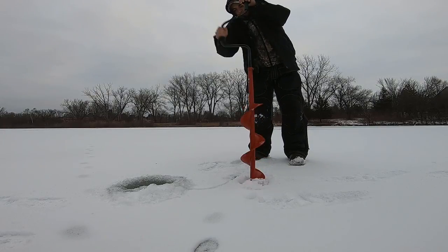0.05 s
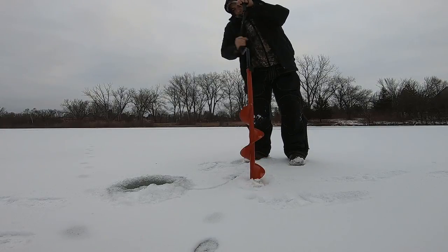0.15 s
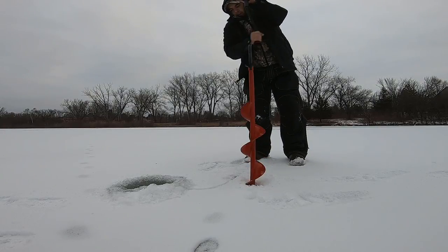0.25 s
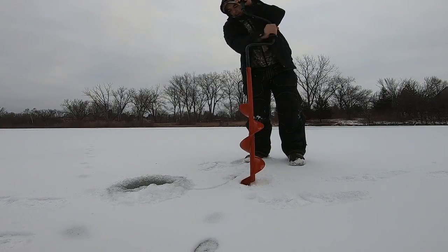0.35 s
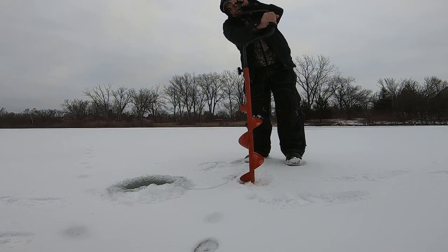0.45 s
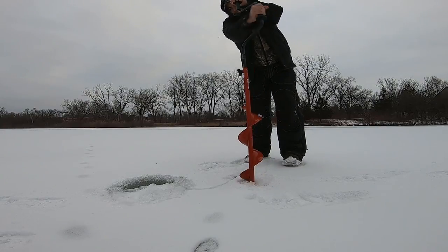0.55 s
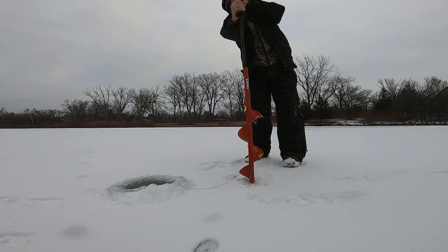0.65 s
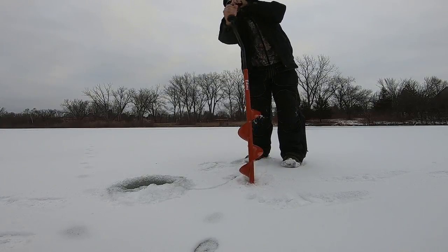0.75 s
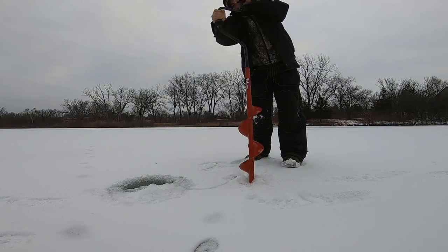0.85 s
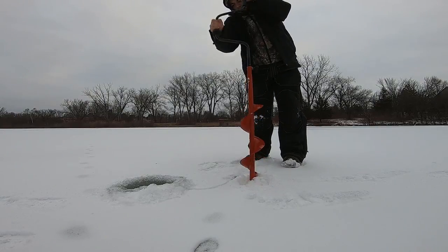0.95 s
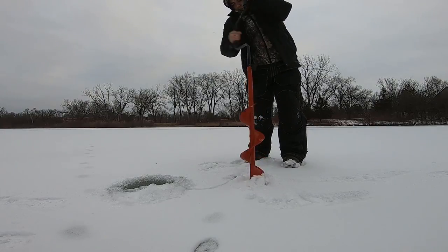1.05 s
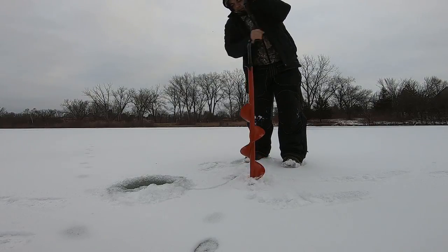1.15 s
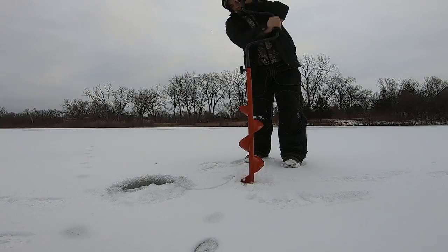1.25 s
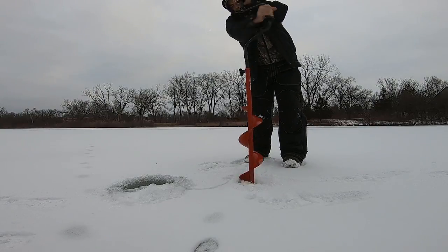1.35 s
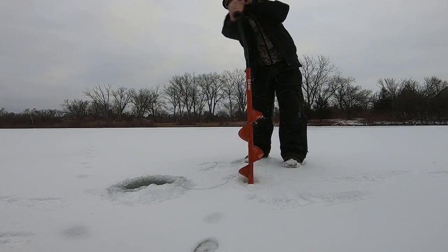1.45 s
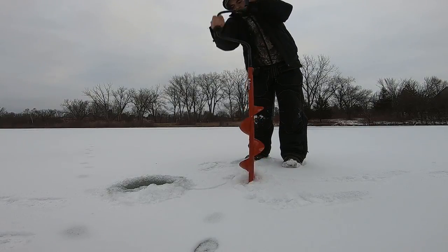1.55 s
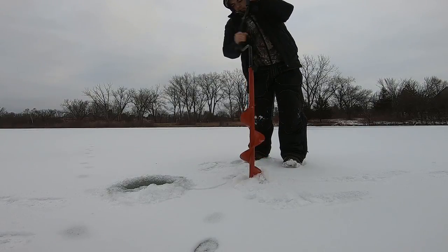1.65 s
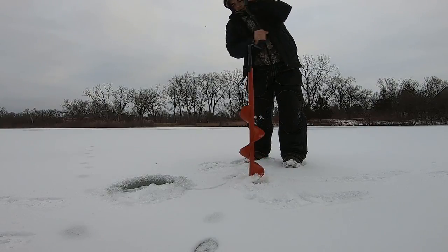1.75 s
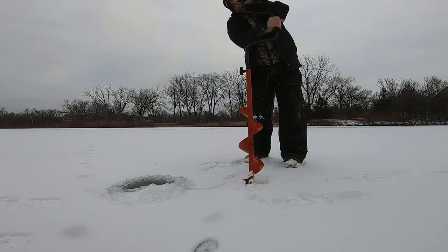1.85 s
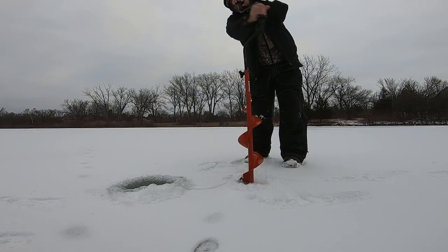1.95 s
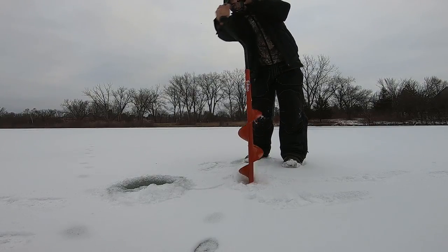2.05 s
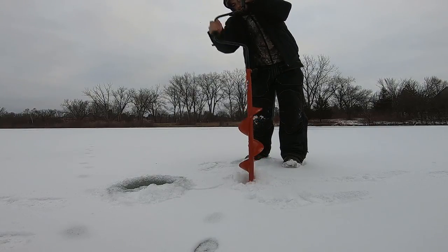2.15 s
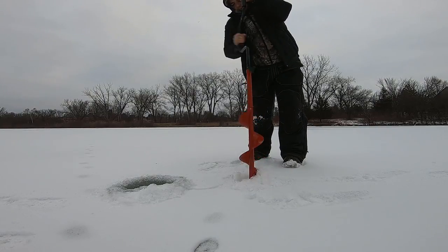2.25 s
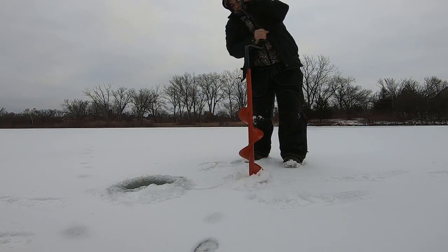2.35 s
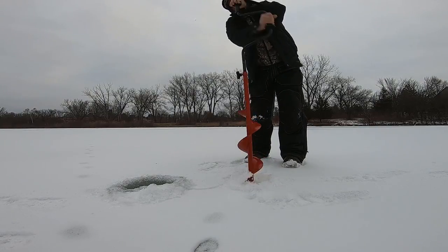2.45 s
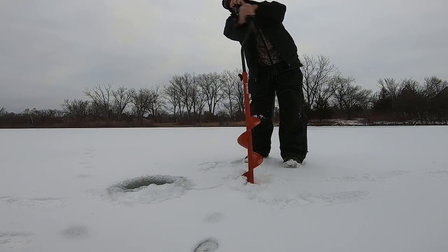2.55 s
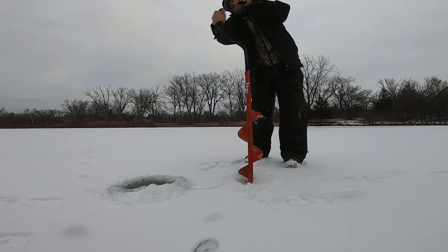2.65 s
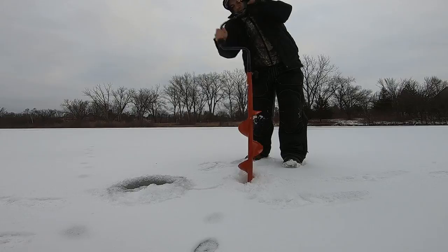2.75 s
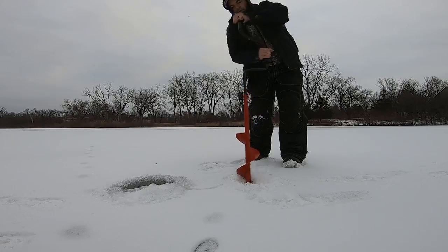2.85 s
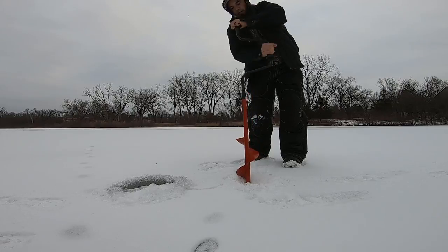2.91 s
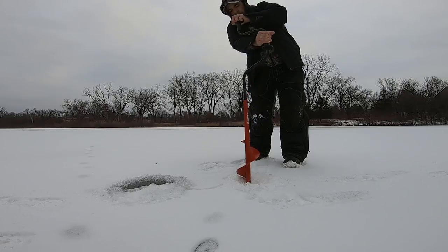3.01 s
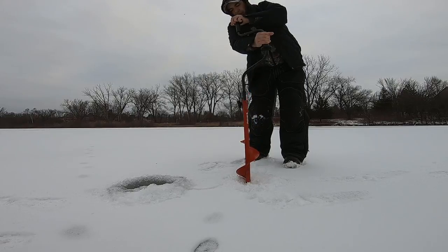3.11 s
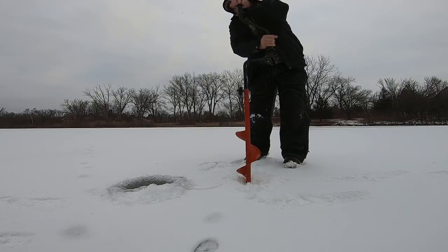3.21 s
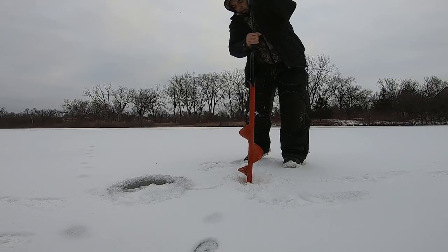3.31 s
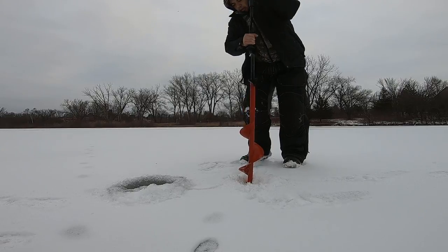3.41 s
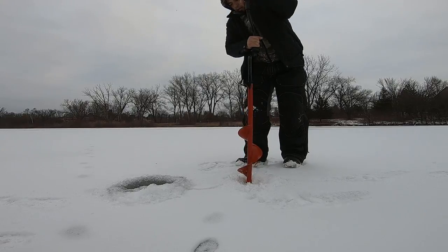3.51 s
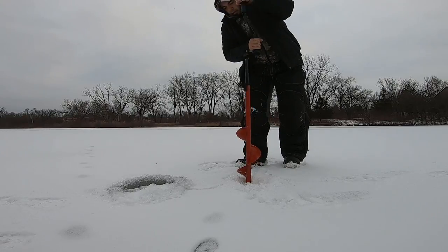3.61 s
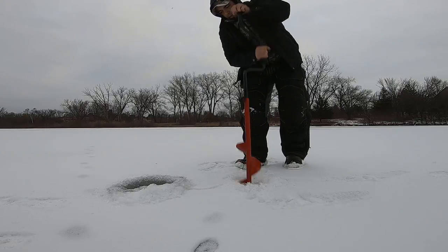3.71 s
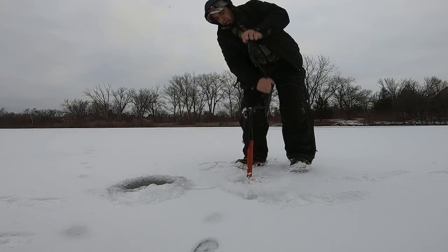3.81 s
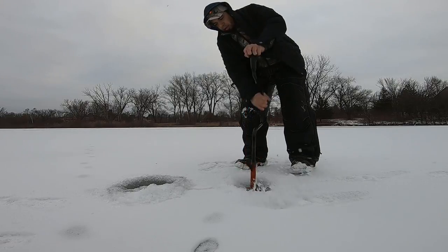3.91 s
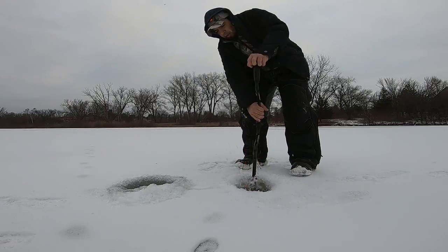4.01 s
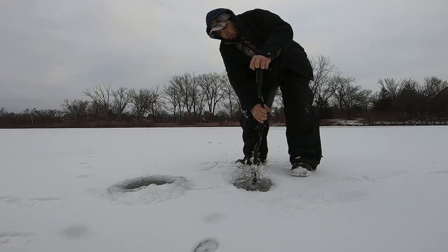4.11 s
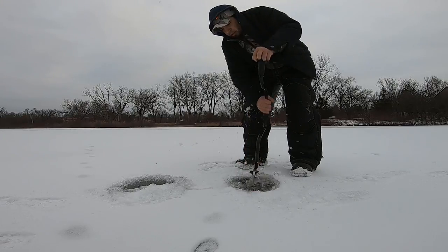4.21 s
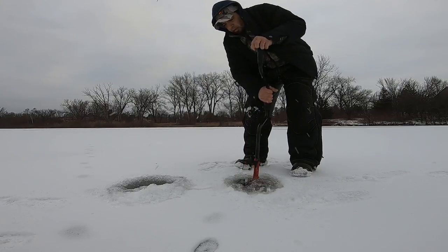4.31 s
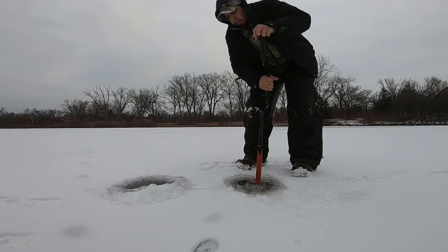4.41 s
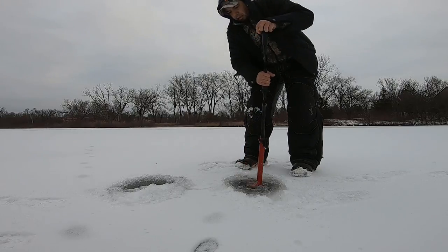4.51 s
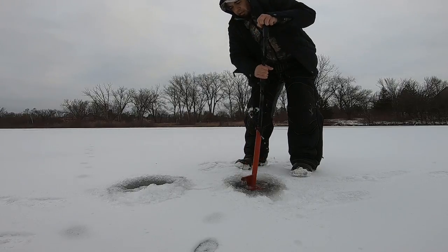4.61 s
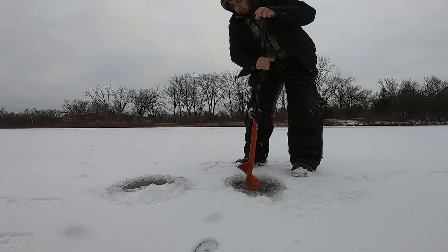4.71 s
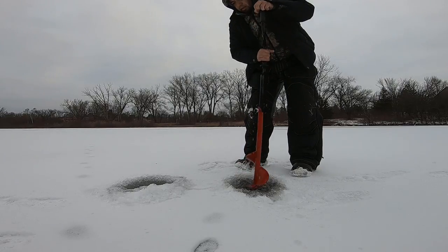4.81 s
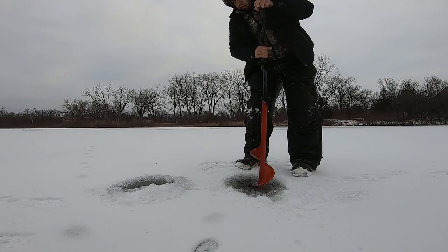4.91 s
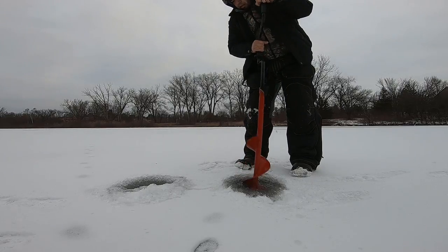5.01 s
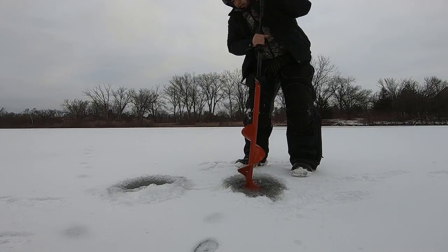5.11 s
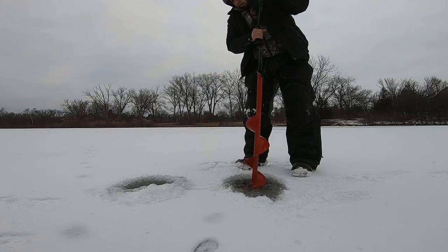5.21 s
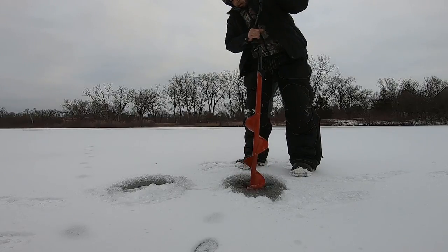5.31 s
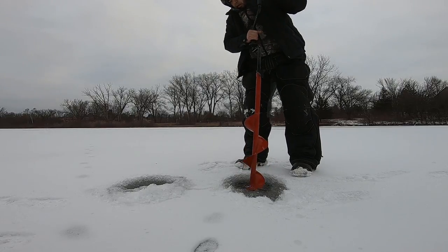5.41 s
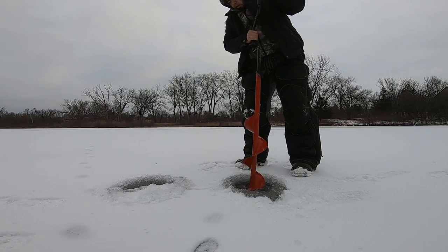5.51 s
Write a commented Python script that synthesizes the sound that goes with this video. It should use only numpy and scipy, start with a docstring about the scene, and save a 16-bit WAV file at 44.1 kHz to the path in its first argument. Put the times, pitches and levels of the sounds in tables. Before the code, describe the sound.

Steel blades chatter and scrape in ice for three seconds, followed by a brief lull, a bubbling surge of water and slapping slush.

```python
"""A hand auger is cranked through lake ice, a few steps away: fractures ring its flights for three seconds.
The blades chatter and chirp as noise rings gliding resonances, then they break through with a knock.
Water gushes up the hole, then lumps of slush slap back: bursts of coloured grains, with ringing bubbles.
Short filtered noise bursts tick, crack and plop. Coloured noise makes a light, rumbling wind and a faint hiss."""
import sys
import numpy as np
from scipy import signal
from scipy.fft import rfft, irfft
from scipy.io import wavfile

SR = 44100
rng = np.random.default_rng(int(sys.argv[2]) if len(sys.argv) > 2 else 0)


def materialize(psi):
    """Save the field psi as 16-bit PCM at rate SR to the path in sys.argv[1].

    A 1-D psi becomes a single channel; in a 2-D psi each row is a channel.
    """
    bounded = np.clip(np.atleast_2d(psi).T, -1, 1)
    quanta = np.round(bounded * 32767).astype(np.int16)
    wavfile.write(sys.argv[1], SR, quanta)


N = 245195

# A knock as the ice breaks, then surges of water and falling slush. Each row: start in seconds,
# length in seconds, spray level in dB, splash level in dB, crunch pitch in Hz.
SPLATS = [(3.025, 0.0039, -37, -32.5, 1200), (3.782, 0.011, -26.5, -41, 2320),
          (3.797, 0.018, -25.5, -29.5, 1950), (3.816, 0.013, -24.5, -40, 1870),
          (3.825, 0.021, -25.5, -31.5, 2790), (3.854, 0.014, -30, -39, 1470),
          (3.861, 0.013, -23.5, -29.5, 2400), (3.875, 0.012, -25.5, -30, 1500),
          (3.896, 0.025, -26, -23.5, 1300), (3.911, 0.013, -22.5, -25, 2470),
          (3.934, 0.0078, -25.5, -31, 4340), (3.944, 0.023, -28.5, -51, 1500),
          (3.969, 0.015, -26.5, -22, 1430), (3.983, 0.02, -25.5, -36, 1580),
          (4.037, 0.029, -36, -29.5, 1560), (4.534, 0.012, -34.5, -37, 1780), (4.561, 0.02, -39, -43, 1590),
          (4.609, 0.024, -37, -48, 2900), (4.645, 0.015, -40, -56, 2130), (4.67, 0.013, -30, -50, 3270),
          (4.699, 0.014, -28, -29.5, 1520), (4.712, .008, -28, -34, 2310), (4.737, .003, -35.5, -37, 4400),
          (4.854, 0.0044, -25, -26.5, 2250), (4.866, 0.01, -26.5, -33.5, 3670),
          (4.901, 0.0066, -27, -52, 3400), (4.916, 0.0049, -27, -43, 3900),
          (4.942, 0.0081, -24.5, -36, 3200), (4.951, 0.016, -28.5, -33, 3800),
          (5.011, 0.0088, -25.5, -56, 2510), (5.072, .017, -25.5, -42, 2200),
          (5.102, 0.018, -26.5, -38.5, 2520), (5.14, 0.0091, -35.5, -53, 1870),
          (5.228, 0.0046, -24, -39, 3770), (5.236, 0.008, -25, -39, 7000), (5.314, 0.012, -27.5, -34, 1610),
          (5.362, 0.024, -37, -35, 3020), (5.447, 0.016, -37.5, -36.5, 1300)]
# Colour of froth. Each row: frequency in Hz, density in dB per Hz.
FROTH_COLOUR = [(250, -3.5), (480, 17), (800, 9), (1400, 6.5), (2200, -21), (5000, -64)]
# Colour of heaving water. Each row: frequency in Hz, density in dB per Hz.
SLOSH_COLOUR = [(40, -33), (110, -11), (160, -1.5), (240, -2.5), (400, -10.5), (650, -52), (2000, -27.5)]
# How hard the water in the hole is stirred. Each row: time in seconds, level in dB.
STIR = [(3.08, -41), (3.13, -51.5), (3.33, -56), (3.4, -47), (3.6, -56.5), (3.67, -53), (3.71, -56),
        (3.77, -46), (3.94, -27.5), (3.99, -25), (4.09, -36.5), (4.22, -43.5), (4.3, -44.5), (4.39, -47.5),
        (4.48, -50.5), (4.6, -37.5), (4.66, -33), (4.73, -38), (4.77, -54.5), (4.84, -42.5), (4.9, -41.5),
        (5.1, -31.5), (5.18, -43), (5.4, -44.5), (5.55, -52)]


def from_db(db):
    """Decibels to gain."""
    return 10 ** (np.asarray(db) / 20)


def rms_one(x):
    """Scale to unit power."""
    return x / np.sqrt(np.mean(x ** 2) + 1e-20)


def add(track, s, sound):
    """Mix a sound into a track at a time in seconds."""
    start = max(round(s * SR), 0)
    track[start:start + len(sound)] += sound[:max(N - start, 0)]


def drift(rate_hz):
    """Smooth random curve with spread 1, from noise through a double pole."""
    step = 40  # samples between points
    r = np.exp(-2 * np.pi * rate_hz * step / SR)
    noise = rng.standard_normal(N // step + 2002)
    slow = rms_one(signal.lfilter([1], [1, -2 * r, r * r], noise)[2000:])
    return np.interp(np.arange(N) / step, np.arange(len(slow)), slow)


def flutter(rate_hz, depth_db):
    """An uneven gain of unit power."""
    return rms_one(from_db(depth_db * np.clip(drift(rate_hz), -2, 2)))


def swells(rows, attack_s, release_s):
    """Rows of (s, length s, dB) as a level that rises, holds and falls back for each."""
    t = np.arange(N) / SR
    level_db = np.zeros(N)
    for s, length, db in rows:
        ramp = np.minimum((t - s) / attack_s, (s + length - t) / release_s)
        level_db += db * np.clip(ramp + 0.5, 0, 1)
    return level_db


def colour(x, spectrum, resonances=()):
    """Causal (minimum-phase) filter from a smooth spectrum and bell-shaped resonances; rms 1."""
    size = 8192
    hz = np.maximum(np.arange(size // 2 + 1) * SR / size, 1)
    at, level = np.transpose(spectrum)
    octaves_outside = np.abs(np.log2(hz / np.clip(hz, at[0], at[-1])))
    db = np.interp(np.log(hz), np.log(at), level) - 18 * octaves_outside
    for centre, width, peak in resonances:
        db = db + peak / (1 + (2 * (hz - centre) / width) ** 2)
    cepstrum = irfft(np.log(from_db(db)))
    # doubling the positive-time half gives minimum phase
    index = np.arange(size)
    folded = 2 * cepstrum * (index < size // 2) * (index > 0)
    response = irfft(np.exp(rfft(folded)))
    return rms_one(signal.oaconvolve(x, response[:size // 2])[:N])


def resonate(x, hz, q):
    """One resonance with gain 1 at its top."""
    return signal.lfilter(*signal.iirpeak(min(hz, SR / 3), q, fs=SR), x)


def grains(per_s, spread_db, hiss_db):
    """Random clicks of very unequal size over the hiss of countless tiny ones; rms 1."""
    size_db = spread_db * np.minimum(rng.exponential(1, N), 5)
    sizes = from_db(size_db) * rng.choice([-1, 1], N)
    clicks = rms_one(sizes * (rng.random(N) < per_s / SR))
    return rms_one(clicks + from_db(hiss_db) * rng.standard_normal(N))


def fizz(per_s, low_hz, high_hz, cycles, count=24, spread_db=0.0, hiss_db=6.5):
    """Small grains of many pitches, each falling 60 dB in the given cycles; rms 1."""
    births = grains(per_s, spread_db, hiss_db)
    dealt = rng.integers(0, count, N)
    out = np.zeros(N)
    for k, hz in enumerate(np.geomspace(low_hz, high_hz, count)):
        r = from_db(-60 * hz / (cycles * SR))
        w = 2 * np.pi * hz / SR
        ring = [0, (1 - r) * np.sin(w)], [1, -2 * r * np.cos(w), r * r]
        out += signal.lfilter(*ring, births * (dealt == k))
    return rms_one(out)


def patchy(x, rate_hz, depth_db, q, count=16):
    """The contact keeps changing, so now this pitch, now that one swells; rms 1."""
    out = x.copy()
    for hz in np.geomspace(1400, 7200, count):
        gain = from_db(depth_db * np.clip(drift(rate_hz), -2, 2))
        out += (gain - 1) * resonate(x, hz, q)
    return rms_one(out)


def glides(rows):
    """Noise rings a resonance that swells, slides in pitch and fades."""
    out = np.zeros(N)
    for s, length, first_hz, last_hz, db, width_hz in rows:
        n = int(length * SR)
        narrow = signal.butter(2, width_hz / 2, fs=SR, output="sos")
        real, imaginary = signal.sosfilt(narrow, rng.standard_normal((2, SR // 2)))[:, -n:]
        phase = 2 * np.pi * np.cumsum(np.linspace(first_hz, last_hz, n)) / SR
        band = rms_one(real * np.cos(phase) + imaginary * np.sin(phase))
        add(out, s, from_db(db) * band * signal.windows.tukey(n, 0.6))
    return out


def chatter():
    """Gain of stick and slip: at uneven intervals the blade jerks loose, then the cut fades until the next."""
    slips_per_s, unevenness, drop_db = 115, 0.55, 3.0
    count = 2 * int(slips_per_s * N / SR)
    wait, strength = rng.standard_normal((count, 2)).T
    slips_s = np.cumsum(np.exp(unevenness * wait)) / slips_per_s
    cycle = np.interp(np.arange(N) / SR, slips_s, np.arange(count))
    return rms_one(from_db(drop_db * (strength[cycle.astype(int)] / 5 - cycle % 1)))


def cutting():
    """Blades catch and slip; each tiny fracture of the ice rings the auger and shakes the shaft."""
    # Colours of the cut, shallow and deep, and of the judder. Each row: frequency in Hz, density in dB per Hz.
    shallow_colour = [(240, -33), (400, -18), (558, 7), (640, -22.5), (828, -1), (1020, -0.5), (1160, -9.5),
                      (2150, -1.5), (2320, -7.5), (2830, 2.5), (3720, -17), (4130, -1.5), (6510, -1.5),
                      (8180, -3.5), (15000, -50)]
    deep_colour = [(240, -30), (400, 4), (576, 1), (650, -6), (994, -4.5), (1210, -2), (1610, -3.5),
                   (2030, -4), (2150, 1), (2920, 0), (4460, -0.5), (7030, -5), (11200, -29.5),
                   (13100, -27.5), (15000, -44)]
    judder_colour = [(30, -15), (65, -58), (105, -9.5), (156, 5), (216, -6.5), (275, 1), (352, -5.5),
                     (500, -6), (700, -24), (1000, -38)]
    # Resonances of the steel flights, and the gaps between. Each row: centre in Hz, width in Hz, peak in dB.
    flights = [(310, 110, 2), (690, 130, 4.5), (835, 85, 9.5), (1013, 63, 7.5), (1280, 78, 0.5),
               (1590, 54, 6.5), (1790, 170, 4.5), (1950, 26, 7.5), (2160, 41, 9), (2310, 98, -3),
               (2740, 55, -3), (3200, 130, -3.5), (3240, 78, 8.5), (3750, 400, 2.5), (4370, 66, 4),
               (5710, 66, 7), (6440, 75, 9)]
    # Blades bite harder (+) or slip (-). Each row: start in seconds, length in seconds, change in dB.
    bites = [(.025, 0.065, 5), (.215, 0.076, 5), (.32, 0.03, -1.5), (.37, 0.088, 2), (.5, 0.05, -2),
             (.62, 0.074, 1), (.68, 0.094, 3), (.81, 0.048, -7), (.885, 0.039, -4.5), (.956, 0.073, 3.5),
             (1.025, 0.16, 2), (1.167, 0.025, 3), (1.235, 0.053, -1.5), (1.305, 0.059, 2.5),
             (1.505, 0.034, 2), (1.55, 0.03, -5.5), (1.597, 0.053, 3), (2.075, 0.047, -1),
             (2.25, 0.16, 1.5), (2.405, 0.031, -3), (2.79, 0.062, 1.5), (2.905, 0.018, -3),
             (2.926, 0.026, -12.5), (3.008, 0.046, -7)]
    # Shaft jolts as the crank is forced round. Each row: start in seconds, length in seconds, judder gain in dB.
    jolts = [(.62, 0.3, 5.5), (.915, 0.052, 8), (1.27, 0.05, 8), (1.5, 0.15, 5), (1.86, 0.092, 7.5),
             (2.01, 0.17, 8.5), (2.47, 0.071, 4.5), (2.78, 0.11, 6.5), (3.005, 0.024, 3)]
    # Blades skim and the cut turns hollow. Each row: start in seconds, length in seconds, midrange change in dB.
    skims = [(.08, .11, 1), (.53, 0.086, -3.5), (1.03, 0.074, -1.5), (1.23, 0.19, -0.5),
             (1.38, 0.095, -4.5), (1.68, .05, -1.5), (2.4, 0.049, 3.5)]
    shallow_db, deep_db = -34, -25
    sinking_s, sunk_s, breakthrough_s, run_out_db_per_s = 0.36, 1.82, 2.98, 292
    judder_base_db, judder_follows = -37, 0.39  # at full depth; its share of the shaving's swing
    bite_attack_s, bite_release_s = 0.0098, 0.018

    t = np.arange(N) / SR
    sunk = np.clip((t - sinking_s) / (sunk_s - sinking_s), 0, 1)
    load_db = (shallow_db - deep_db) * (1 - sunk) + swells(bites, bite_attack_s, bite_release_s)
    load_db -= run_out_db_per_s * np.maximum(t - breakthrough_s, 0)
    judder_db = judder_base_db + judder_follows * load_db + swells(jolts, attack_s=0.035, release_s=0.1)

    catch = chatter() * flutter(rate_hz=11, depth_db=-0.3)
    fractures = grains(per_s=2500, spread_db=2.0, hiss_db=7.5)
    cracks = from_db(-7.5) * grains(per_s=150, spread_db=1.8, hiss_db=-8)  # coarse
    fractures = patchy(fractures + cracks, rate_hz=12, depth_db=3.6, q=55, count=44)
    # larger flakes break off with a short clink
    flakes = fizz(per_s=650, low_hz=1308, high_hz=7600, cycles=100, count=48, spread_db=1.2, hiss_db=-25)
    fractures = (fractures + from_db(-9.5) * flakes) * catch

    shallow = colour(fractures, shallow_colour, flights)
    # the ice around the flights damps their ring
    deep = colour(fractures, deep_colour, np.array(flights) * [1, 1, 0.75])
    deep_share = 0.44 + 0.4 * sunk
    shaving = rms_one((1 - deep_share) * shallow + deep_share * deep)
    hollow = from_db(swells(skims, bite_attack_s, bite_release_s))
    shaving = shaving + (hollow - 1) * resonate(shaving, hz=1300, q=0.47)

    shakes = grains(per_s=500, spread_db=2.0, hiss_db=-19.5) * catch
    judder = colour(shakes, judder_colour, flights)
    return from_db(deep_db + load_db) * shaving + from_db(judder_db) * judder


def chirps():
    """Stick and slip of a blade as a hoarse, gliding rasp of narrow-band noise; a very narrow band near 2.2 kHz
    is the ring of the flights swelling and wavering."""
    # Each row: start in seconds, length in seconds, first and last pitch in Hz, rms before fading in dB,
    # width in Hz.
    rasps = [(0.205, .11, 2560, 2395, -36, 400), (.21, 0.26, 2205, 2160, -42.5, 50),
             (0.656, 0.12, 3420, 3310, -37.5, 200), (.912, 0.027, 4100, 4200, -31, 450),
             (0.938, 0.095, 3890, 5150, -30, 1000), (0.937, 0.06, 3010, 3240, -33, 260),
             (1.042, 0.19, 2730, 2680, -36.5, 340), (1.164, .06, 2250, 2190, -34, 150),
             (1.42, 0.1, 4920, 4660, -33.5, 300), (1.589, 0.063, 4100, 5000, -28, 350),
             (1.593, 0.043, 3330, 3270, -28, 200), (1.695, .12, 1600, 1550, -31.5, 320),
             (1.682, 0.13, 2740, 2710, -33, 300), (1.716, 0.065, 4500, 4600, -33.5, 300),
             (1.798, 0.092, 3750, 3860, -33, 300), (1.94, .07, 5030, 4860, -29, 250),
             (2.043, 0.042, 4550, 4460, -29, 200), (2.256, 0.057, 5560, 5750, -30, 180),
             (2.276, 0.09, 1664, 1790, -28.5, 130), (2.344, 0.047, 2830, 2630, -29.5, 120),
             (2.484, 0.066, 3850, 3730, -30.5, 200), (2.535, 0.054, 4780, 5170, -27.5, 350),
             (2.911, .014, 6120, 5630, -22.5, 2370), (2.966, 0.012, 2000, 1950, -28, 160)]
    return glides(rasps)


def ticks():
    """Short ticks, cracks, knocks and plops: decaying noise rings a resonance, with the top softened."""
    # Each row: time in seconds, peak in dB, pitch in Hz, sharpness of the ring as Q (0.8 at least is used).
    strikes = [(.914, -19.5, 3020, 1.6), (1.749, -14, 4420, 1.5), (1.843, -16, 3860, 2),
               (2.179, -14, 3580, 13), (2.223, -17, 4250, 3.1), (2.321, -14, 2600, 1.4),
               (2.398, -19, 2390, 1.1), (2.492, -10, 3580, 0.95), (3.029, -23.5, 1000, 1.4),
               (3.161, -43, 880, 1.7), (3.314, -29.5, 5500, 9), (3.458, -42, 2210, 4.6),
               (3.654, -33, 3340, 0.75), (3.723, -22.5, 6000, 5.5), (3.802, -20, 6500, 8.3),
               (3.864, -18, 6300, 7.9), (3.999, -17, 6450, 10), (4.14, -27.5, 1350, 3.7),
               (4.154, -21, 1530, 3), (4.386, -32, 4280, 6.7), (4.4, -35, 5900, 3.9),
               (4.415, -36.5, 6800, 5), (4.537, -25.5, 5200, 20), (4.807, -34, 5940, 3.3),
               (4.945, -20, 6700, 13), (4.959, -17, 6800, 18), (5.232, -9.5, 3730, 3.8),
               (5.367, -24.5, 2400, 0.73)]
    t60_s = 0.023
    out = np.zeros(N)
    t = np.arange(SR // 20) / SR
    dull = signal.butter(2, 7000, fs=SR, output="sos")
    for s, db, hz, q in strikes:
        burst = rng.standard_normal(len(t)) * from_db(-60 * t / t60_s)
        strike = signal.sosfilt(np.vstack([dull, dull, dull]), resonate(burst, hz, max(q, 0.8)))
        add(out, s, from_db(db) * strike / np.abs(strike).max())
    return out


def splat(noise, length, db, rise_s, t60_s):
    """A smack that sags for its length and then dies away."""
    sag_db_per_s, landing_db, landing_s = 74, 3.0, 0.007  # strongest as it lands
    t = np.arange(len(noise)) / SR
    level_db = sag_db_per_s * (length / 2 - t) - 60 * np.maximum(t - length, 0) / t60_s
    level_db += landing_db * (np.exp(-t / landing_s) - 0.5)
    shape = (1 - np.exp(-t / rise_s)) * from_db(level_db)
    loud_part = noise[:int((length + t60_s / 10) * SR)]
    return from_db(db) * shape * noise / np.std(loud_part)


def splats():
    """Each surge or lump throws spray and shards with its own crunch, whips up froth and heaves the water."""
    # Colour of the spray. Each row: frequency in Hz, density in dB per Hz.
    spray_colour = [(700, -34), (1500, -4), (2500, 3.5), (4000, 3.5), (6500, 9), (8000, 10.5), (9500, -2.5),
                    (11000, -7), (13500, -12), (15500, -26)]
    impact_s = 0.0013
    thud_base_db, thud_follows = -35.5, 0.32  # under a splash of -30 dB; its share of the splash's swing
    base_top_hz, top_octaves_per_db = 6700, 0.52  # top of a spray of -25 dB; harder ones are brighter

    drops = grains(per_s=1700, spread_db=1.0, hiss_db=-10)
    drops = patchy(drops, rate_hz=16, depth_db=4.5, q=30, count=24)
    shards = fizz(per_s=900, low_hz=1000, high_hz=7300, cycles=45, count=40, spread_db=1.5, hiss_db=-30)
    drops = (drops + from_db(-1) * shards) * flutter(rate_hz=160, depth_db=-2.0)
    drops = colour(drops, spray_colour)
    froth = colour(fizz(per_s=3100, low_hz=392, high_hz=2190, cycles=12.0), FROTH_COLOUR)
    heave = colour(rng.standard_normal(N), SLOSH_COLOUR)

    out = np.zeros(N)
    for s, length, spray_db, splash_db, crunch_hz in SPLATS:
        span = slice(int(s * SR), int(s * SR) + SR // 5)
        top_hz = base_top_hz * 2 ** (top_octaves_per_db * (spray_db + 25))
        thud_db = thud_base_db + thud_follows * (splash_db + 30)
        spray = drops[span] + 1.8 * resonate(drops[span], crunch_hz, q=7.0)
        spray = signal.sosfilt(signal.butter(2, min(top_hz, SR / 3), fs=SR, output="sos"), spray)
        add(out, s, splat(spray, length, spray_db, rise_s=impact_s, t60_s=0.046))
        add(out, s, splat(froth[span], length, splash_db, rise_s=2 * impact_s, t60_s=0.063))
        add(out, s, splat(heave[span], length, thud_db, rise_s=0.0018, t60_s=0.11))
    return out


def bubble(hz, db):
    """A trapped pocket of air rings, its pitch climbing as it nears the surface; smaller ones die sooner."""
    rise = 0.32  # share of the pitch gained over one t60
    t60_s = 0.029 * np.sqrt(1000 / hz)
    t = np.arange(int(1.5 * t60_s * SR)) / SR
    phase = 2 * np.pi * hz * (t + rise * t ** 2 / (2 * t60_s))
    return from_db(db - 60 * t / t60_s) * (1 - np.exp(-2 * hz * t)) * np.sin(phase)


def droplets(per_splat=4):
    """Each splat flings a few drops into the water, and each drop traps a small ringing bubble."""
    loudest_db, delay_s = -2, 0.012  # against the spray; how late the drops may fall
    lowest_hz, range_octaves = 620, 2.4
    out = np.zeros(N)
    for s, length, spray_db, _, _ in SPLATS:
        for wait, pitch, size in rng.random((per_splat, 3)):
            hz = lowest_hz * 2 ** (range_octaves * pitch)
            db = spray_db + loudest_db - 10 * size
            add(out, s + wait * (length / 2 + delay_s), bubble(hz, db))
    return out


def stir_swing_db():
    """How far the stirring of the water lies above its -45 dB reference, at every sample."""
    s, db = np.transpose(STIR)
    return np.interp(np.arange(N) / SR, s, db) + 45


def bubbles(count=260):
    """The breakthrough knock and large bubbles ring; small ones gurgle, louder the more the water is stirred."""
    # Large bubbles, and at 3.03 s the ringing knock of the blade breaking through.
    # Each row: start in seconds, starting pitch in Hz, level before decay in dB.
    rings = [(3.027, 690, -27), (3.03, 1220, -33), (3.672, 124, -22.5), (3.903, 433, -25),
             (3.905, 198, -10.5), (3.924, 620, -18), (3.944, 730, -18), (3.955, 179, -15), (3.996, 343, -9),
             (4.012, 393, -9), (4.04, 1300, -27), (4.052, 835, -16), (4.067, 2250, -26), (4.099, 442, -22),
             (4.154, 1000, -20), (4.348, 161, -25), (4.384, 173, -29), (4.503, 161, -23.5),
             (4.648, 564, -29), (4.703, 1460, -20), (4.714, 550, -40), (4.802, 1210, -31.5),
             (4.855, 1214, -18.5), (4.959, 1220, -24), (5.019, 760, -22.5), (5.232, 1690, -15),
             (5.32, 197, -17), (5.367, 232, -19)]
    from_s, for_s = 3.4, 1.35
    lowest_hz, range_octaves = 391, 2.3
    small_db, range_db = -41, 12  # loudest at the reference stir
    out = np.zeros(N)
    for s, hz, db in rings:
        add(out, s, bubble(hz, db))
    swing_db = stir_swing_db()
    for when, pitch, size in rng.random((count, 3)):
        s = from_s + for_s * when
        hz = lowest_hz * 2 ** (range_octaves * pitch ** 2)  # most are low
        db = small_db + swing_db[min(int(s * SR), N - 1)] - range_db * size
        add(out, s, bubble(hz, db))
    return out


def gurgles():
    """Water runs off the flights and gurgles in the hole: gliding bands of noise."""
    # Each row: start in seconds, length in seconds, first and last pitch in Hz, rms before fading in dB,
    # width in Hz.
    runs = [(3.17, .19, 720, 830, -60.5, 250), (4.315, .032, 1054, 1470, -51.5, 60),
            (4.43, 0.026, 640, 935, -46, 40), (4.46, .11, 369, 587, -52, 90),
            (4.53, .24, 660, 631, -46.5, 278), (4.72, 0.12, 530, 762, -49.5, 160),
            (4.86, .28, 680, 777, -54, 300)]
    return glides(runs)


def stirring():
    """Once the ice is pierced, water trickles, froths and sloshes round the shaft, louder when stirred."""
    # Colour of the trickle. Each row: frequency in Hz, density in dB per Hz.
    trickle_colour = [(700, -29), (1500, -4), (6500, -7), (8000, -10), (10000, -9.5), (15000, -17)]
    pierced_s, seep_s = 2.98, 0.22
    swing_db = stir_swing_db()
    pierced = np.clip((np.arange(N) / SR - pierced_s) / seep_s, 0, 1)
    lapping = flutter(rate_hz=5.2, depth_db=4.5)
    trickle = fizz(per_s=1300, low_hz=1200, high_hz=7600, cycles=38, count=30, spread_db=1.3, hiss_db=-3)
    trickle = colour(trickle, trickle_colour)
    froth = colour(fizz(per_s=1200, low_hz=394, high_hz=2420, cycles=45), FROTH_COLOUR)
    slosh = colour(rng.standard_normal(N), SLOSH_COLOUR)
    # each layer's level at the reference stir, and its share of the swing
    water = from_db(-52.5 + 0.88 * swing_db) * trickle
    water += from_db(-58 + 1.23 * swing_db) * froth
    water += from_db(-47 + 0.48 * swing_db) * slosh
    return pierced * lapping * water


def open_air():
    """A light breeze rumbles under a steady hiss, both coloured noise."""
    # Colours of wind and hiss. Each row: frequency in Hz, density in dB per Hz.
    wind_colour = [(20, -21), (45, -2.5), (75, 7.5), (120, -8), (230, 5.5), (310, -11.5), (430, -36),
                   (700, -53)]
    hiss_colour = [(300, 3), (500, 5), (700, 7), (1200, 9), (4000, -3), (7000, 7), (9000, -10),
                   (12000, -35), (15000, -64)]
    wind_db, hiss_db = -47, -62
    gusts = flutter(rate_hz=5, depth_db=1.5)
    wind = from_db(wind_db) * colour(rng.standard_normal(N), wind_colour) * gusts
    hiss = from_db(hiss_db) * colour(rng.standard_normal(N), hiss_colour)
    return wind + hiss


def side_noise():
    """Faint coloured noise, later given opposite signs in the two channels."""
    # Each row: frequency in Hz, density in dB per Hz.
    side_colour = [(40, -12), (400, -40), (2000, -19), (6500, 18), (9000, 15), (14000, 28)]
    return from_db(-70) * colour(rng.standard_normal(N), side_colour)


def scene():
    """All happens straight ahead; a faint decorrelated copy and noise widen it slightly."""
    ahead = cutting() + chirps() + ticks() + splats() + droplets()
    ahead += bubbles() + gurgles() + stirring() + open_air()
    copy_db, smear_t60_s = -44.5, 0.095
    t = np.arange(SR // 50) / SR
    smear = rng.standard_normal(len(t)) * from_db(-60 * t / smear_t60_s)
    wide = from_db(copy_db) * signal.oaconvolve(ahead, smear / np.linalg.norm(smear))[:N]
    wide += side_noise()
    return np.array([ahead + wide, ahead - wide])


def record(dry):
    """A steep low-pass cuts the top, 70 dB down from 15.8 kHz."""
    return signal.sosfilt(signal.cheby2(14, 70, 15800, fs=SR, output="sos"), dry)


dry = scene()
out = record(dry)
materialize(out)
```